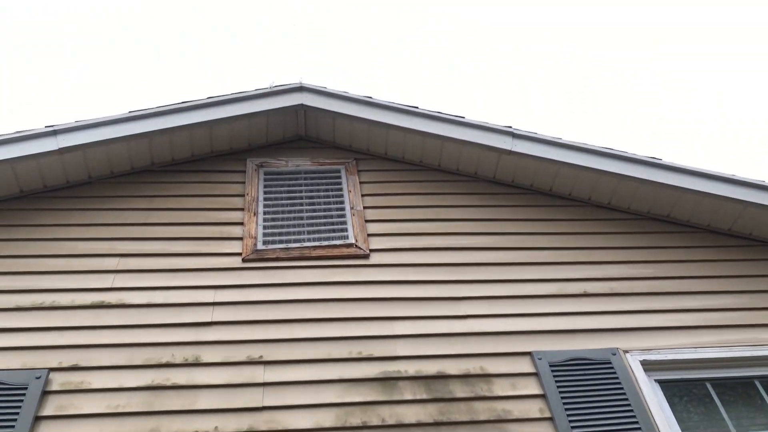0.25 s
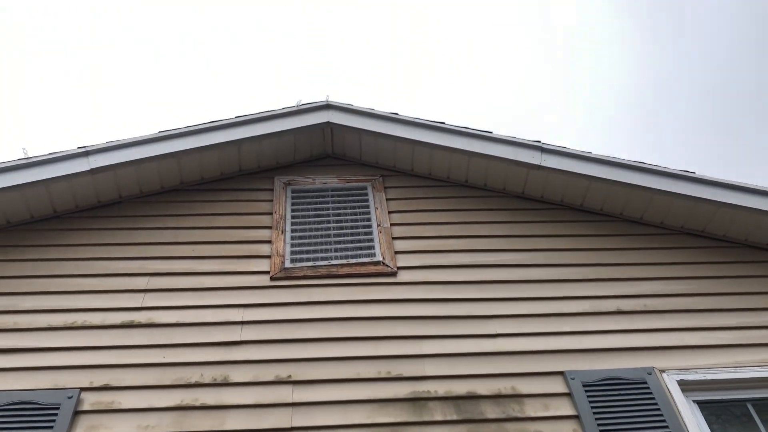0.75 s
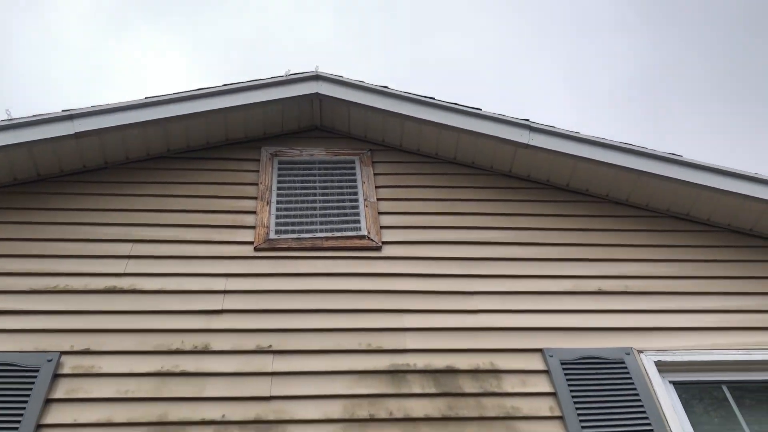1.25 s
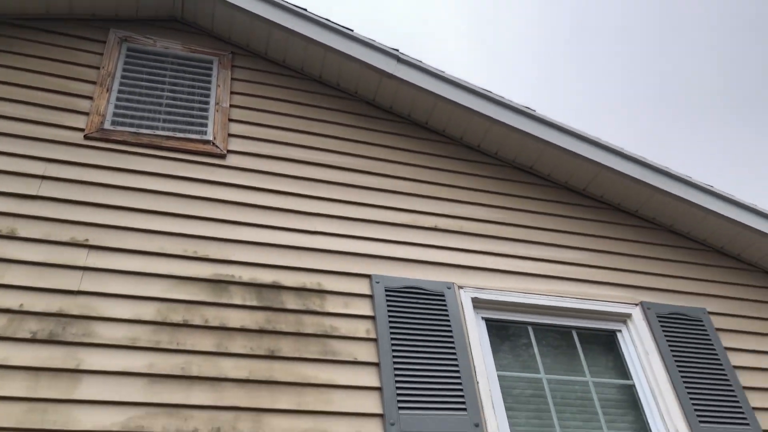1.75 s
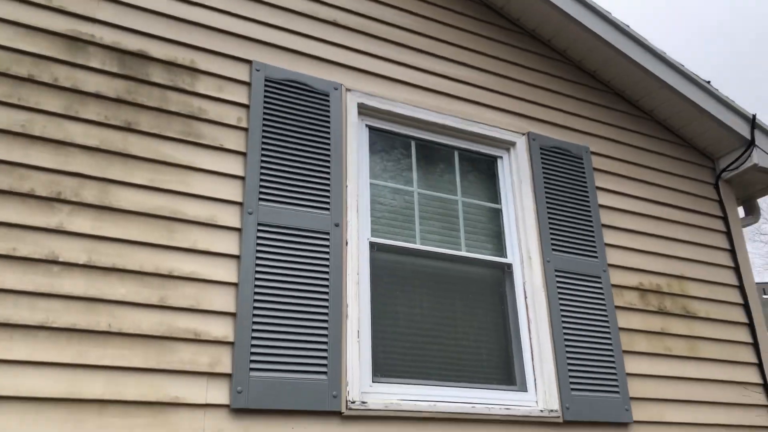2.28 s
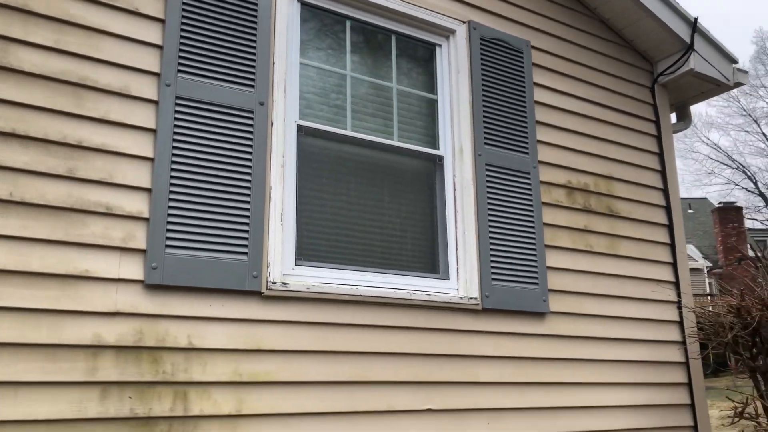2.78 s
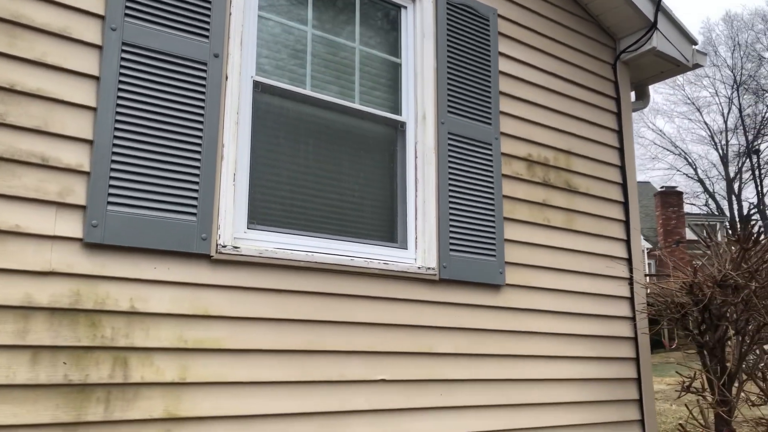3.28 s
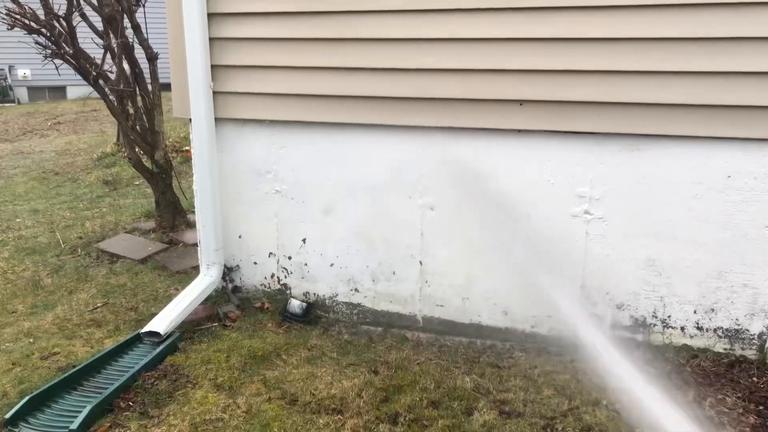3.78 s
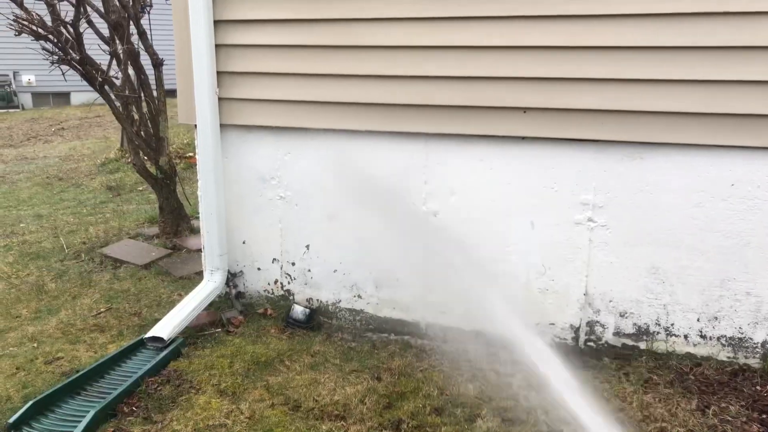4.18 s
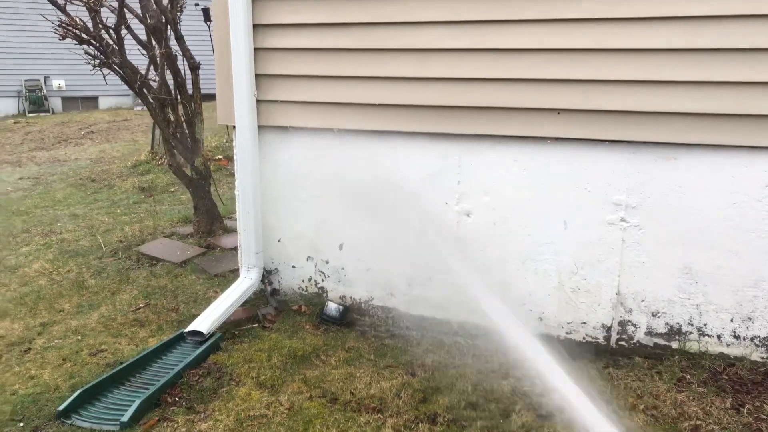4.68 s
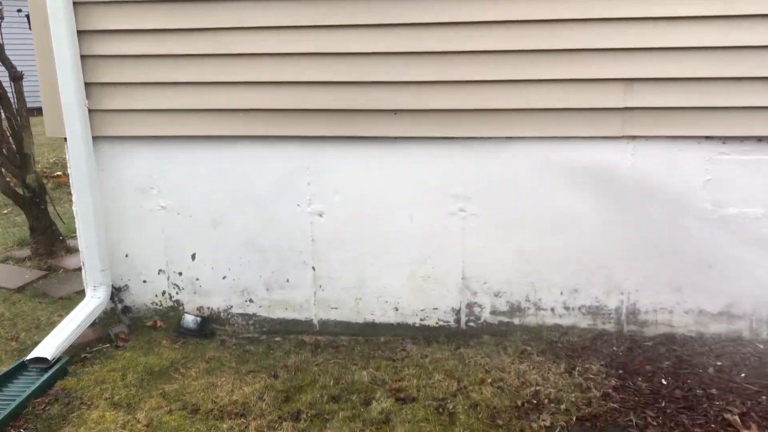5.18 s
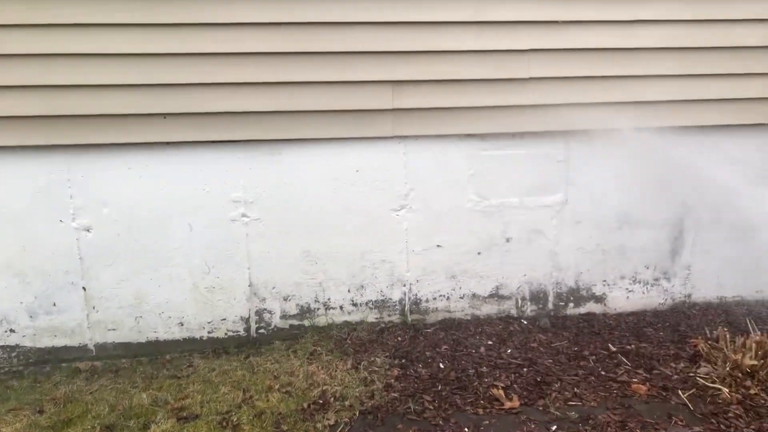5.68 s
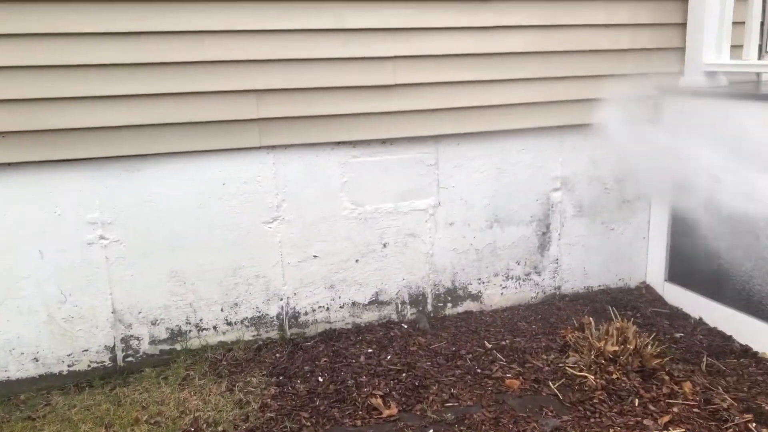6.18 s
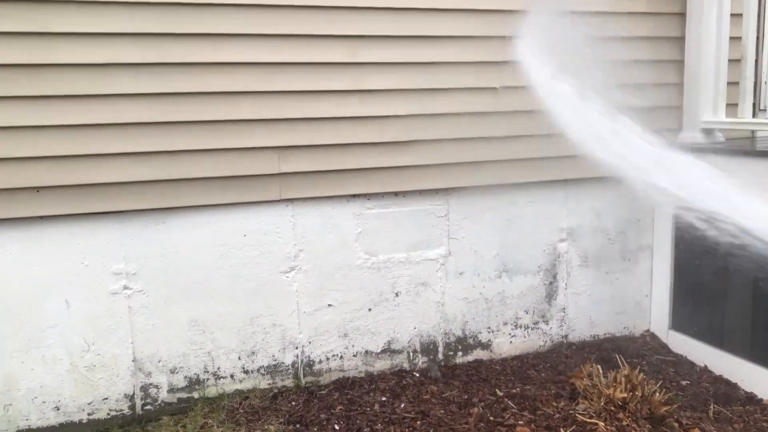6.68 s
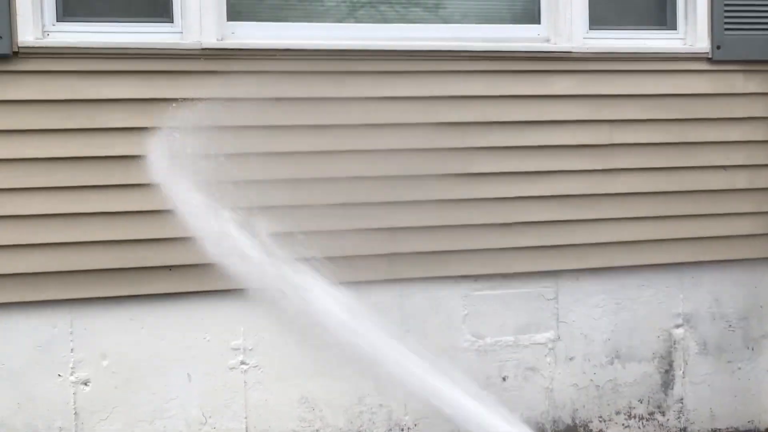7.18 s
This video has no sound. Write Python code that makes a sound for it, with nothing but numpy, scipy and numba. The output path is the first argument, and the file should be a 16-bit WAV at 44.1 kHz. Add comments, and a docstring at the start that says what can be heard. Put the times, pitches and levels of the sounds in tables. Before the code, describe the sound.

Outdoors beside a house, a one-cylinder petrol pressure washer runs some way off, with a steady low thumping and a light rattle that slowly grows. Faint drops splat and plink from the wet siding, becoming a little clearer between 2 and 3 seconds. At about 3.5 seconds the jet opens abruptly, close by: a loud, bright hiss with a high ring from the nozzle and a lower rush of water on the wall. At the same moment the engine drops slightly in pitch and thumps harder, joined by the pump's hum. The spray swells with a brief swish around 4.2 seconds, then eases a little from 5 to 6 seconds. A few more soft swishes come between 6 and 7 seconds. From about 6.3 seconds the rush grows fuller as the water climbs onto hollow siding, and the hiss is strongest at the end, near 7.5 seconds.

```python
"""Beside a house, water drips from the wet siding while a petrol pressure washer runs some way off.
Each drop lands with a splat or a plink, and the one-cylinder engine thumps and rattles. When the trigger
is pulled, the pump loads the engine, which slows and thumps harder. The jet hisses close by, and its
churning flow makes the nozzle ring. The fan of water sweeps along the wall and sizzles over its edges."""
import sys
import numpy as np
from scipy import signal
from scipy.fft import rfft, irfft
from scipy.io import wavfile
from scipy.ndimage import uniform_filter1d, map_coordinates
from numba import njit

SR = 44100
rng = np.random.default_rng(int(sys.argv[2]) if len(sys.argv) > 2 else 0)


def transcribe(u):
    """Save the signal u as a 16-bit wav file named by the first command-line argument.

    u: samples, shape (n,) or (channels, n), limited to [-1, 1]; the rate is SR.
    q: integer samples, one column per channel.
    """
    v = np.clip(np.atleast_2d(u).T, -1, 1)
    q = np.round(v * 32767).astype(np.int16)
    wavfile.write(sys.argv[1], SR, q)


N = 328104
TIME = np.arange(N) / SR

# the wand sweeps nearer and farther: t/s, spray strength/dB, nozzle ring/dB (0 dB is the usual)
WAND_SWEEP = [(3.5, -0.1, -1.1), (4.1, 1.3, 0.1), (4.35, 2.1, 1.5), (4.63, 1.5, 1.5), (5.08, -2.4, -1.6),
              (5.4, -1.4, -1.2), (5.8, -1.7, -2.8), (5.98, -3.5, -3.5), (6.17, -1.7, -3), (6.38, -0.5, 1.5),
              (6.54, -0.9, 0.5), (6.66, -2.5, 0.2), (6.8, 2, 5.5), (6.9, 2.5, 5), (7.02, 0.9, 1.5),
              (7.17, 3.5, 4.5), (7.35, 2, 3), (7.44, 4.5, 5.1)]
# the pitches at which the nozzle rings: multiple of the lowest, width/Hz, relative level/dB
NOZZLE_RINGS = [(1, 375, 0), (2.535, 720, -6.2), (3.92, 1050, -8.5)]
# tone colours of the water's low rush, its hiss and its fine mist: f/Hz, relative level/dB
RUSH_COLOUR = [(25, -18), (60, -6), (110, -2.5), (190, 2), (330, -3.5), (520, 1.5), (900, 0.5), (1600, 0.5),
               (2200, -7), (4000, -3.5), (16000, -34)]
HISS_COLOUR = [(1200, -40), (2050, -1.5), (3100, -4.5), (4100, -6.5), (4900, -1.5), (5500, -3.5), (7000, 0),
               (8400, 0), (10000, -1.5), (12000, -7.5), (16000, -25)]
MIST_COLOUR = [(5000, -41), (8500, -9.5), (11000, -0.5), (12200, 1.5), (13400, 0), (14600, 3.5),
               (16000, -2.5)]
# the jet sings over an edge or hollow of the wall: t/s, length/s, start f/Hz, end f/Hz, width/Hz, level/dB
WALL_EDGES = [(4.19, .14, 3700, 4300, 850, -28), (4.24, .12, 5750, 5450, 750, -22),
              (6.10, .16, 6000, 4600, 600, -33), (6.21, .18, 4350, 4200, 600, -30.5),
              (6.32, .11, 5900, 5700, 800, -29), (6.92, .15, 3700, 4700, 800, -30.5),
              (6.96, .11, 5800, 5950, 800, -29)]
# the exhaust note, running free and under load: multiple of the cycle rate, relative level/dB
FREE_HARMONICS = [(1, -27), (2, 0.5), (3, -3.5), (4, -5.5), (5, -19), (6, -11.5), (7, -29), (8, -14.5),
                  (9, -12.5), (10, -25), (11, -24), (12, -24), (13, -48)]
LOADED_HARMONICS = [(1, -31), (2, 0), (3, -0.5), (4, -8), (5, 0.5), (6, -11), (7, -30), (8, -14.5),
                    (9, -14.5), (10, -21), (11, -19.5), (12, -17), (21, -18), (26, -11), (27, -23)]
# tone colours of the engine's low clatter and bright rattle: f/Hz, relative level/dB
CLATTER_COLOUR = [(25, -18), (55, -15), (90, -7), (200, 0), (340, -5.5), (480, 0.5), (800, -1.5),
                  (1100, -2), (1600, -6), (2300, -12), (4000, -22.5), (16000, -69)]
RATTLE_COLOUR = [(1000, -20), (2200, -4), (3000, 0), (4600, -3), (5600, -8), (7000, -9.5), (9000, -17.5),
                 (12000, -24.5), (16000, -27)]
# the loudest drips: t/s, peak level/dB, f/Hz, width/Hz
LOUD_DRIPS = [(.680, -44, 10000, 10000), (1.323, -47, 11900, 10000), (1.595, -43, 4990, 600),
              (1.648, -43, 7700, 1400), (1.941, -40, 14000, 9000), (2.041, -35, 10000, 13000),
              (2.229, -40, 13500, 9000), (2.374, -40, 4930, 500), (2.551, -39, 12500, 10000),
              (2.618, -41, 5670, 900), (2.916, -36, 4800, 9000), (2.923, -43, 7350, 1500),
              (2.958, -43, 7650, 800), (3.070, -33.5, 8000, 11000), (3.110, -44, 12300, 3500),
              (3.219, -44, 12000, 12000)]

TRIGGER_S, OPEN_S = 3.486, .021  # when the valve opens, and how long that takes
SIDING_S, CLIMB_S = 6.29, .23  # when the jet climbs from concrete footing to siding, and for how long
FREE_HZ, LOADED_HZ, SLOWING_S = 32.2, 30.15, .045  # engine cycles a second, and the time to settle


def jet():
    """Water rushes and hisses on the wall, following the wand; the hollow siding drums louder."""
    strength_db, ring_db = along(WAND_SWEEP)
    on_siding = np.clip((TIME - SIDING_S) / CLIMB_S, 0, 1)
    ringing = nozzle(strength_db, ring_db, on_siding)
    rush = colour(spray(flutter_db=.53, grain_db=.5), RUSH_COLOUR)
    rush *= undb(-30 + .3 * strength_db + 2.4 * on_siding)
    hiss = colour(spray(flutter_db=.5, grain_db=.5), HISS_COLOUR)
    hiss *= undb(-22.5 + .99 * strength_db - .05 * on_siding)
    mist = colour(spray(flutter_db=.35, grain_db=3), MIST_COLOUR)
    mist *= undb(-22 + 1.05 * strength_db)
    return ringing + rush + wall_echo(hiss + mist, share=.17 + .08 * on_siding)


def nozzle(strength_db, ring_db, on_siding, rest_hz=2488):
    """Churning water rings the nozzle; a stronger jet lifts the pitch and favours the upper rings."""
    lowest_hz = (rest_hz + 3.5 * strength_db + 45 * on_siding) * (1 + .0062 * wander(20))
    flow = spray(flutter_db=.83, grain_db=1.5)
    out = 0
    for ratio, width, db in NOZZLE_RINGS:
        boost_db = .43 * strength_db if ratio > 1 else 0
        out += undb(db + boost_db) * ring(flow, ratio * lowest_hz, width)
    return unit(out) * undb(-24.5 + ring_db + .97 * wander(12))


def spray(flutter_db, grain_db):
    """A thick hail of droplets, large and small, flutters as the jet breaks up."""
    return rng.standard_normal(N) * undb(flutter_db * wander(110) + grain_db * np.tanh(wander(2500)))


def wall_echo(sound, share, usual_lag_s=.000502):
    """The wall's echo follows closely; its lag changes as the wand sways, so the hiss swirls."""
    lag_s = usual_lag_s * np.exp(.29 * wander(4))
    echo = map_coordinates(sound, [(TIME - lag_s) * SR], mode="nearest")
    return (sound + share * echo) / np.sqrt(1 + share ** 2)


def edges():
    """A short, gliding ring swells and fades as the fan of water crosses an edge."""
    out = np.zeros(N)
    for start_s, length_s, start_hz, end_hz, width, db in WALL_EDGES:
        start, n = int(start_s * SR), int(length_s * SR)
        swish = ring(rng.standard_normal(SR)[:n], np.geomspace(start_hz, end_hz, n), width)
        out[start:start + n] += unit(swish) * np.hanning(n) * undb(db)
    return out


def engine(load):
    """One cylinder thumps, clatters and faintly whines; under load the pump's drone joins in."""
    cycle_hz = LOADED_HZ + (FREE_HZ - LOADED_HZ) * np.exp(-np.maximum(TIME - TRIGGER_S, 0) / SLOWING_S)
    cycles = np.cumsum(cycle_hz * (1 + .00296 * wander(25) + .001204 * wander(2))) / SR
    free = exhaust(cycles, FREE_HARMONICS, smear=-.85, rough=.03) * undb(-35.5)
    loaded = exhaust(cycles, LOADED_HARMONICS, smear=-1.3, rough=.038) * undb(-28.5)
    pump = tone(hz=175.7, db=-41.5, waver=.00648)
    whine = tone(hz=2330, db=-66, waver=.01) * undb(2 * wander(5.6))
    clatter = colour(knocks(cycles, depth=.032), CLATTER_COLOUR)
    clatter *= undb(-43 + .35 * wander(6.03))  # wavers with the engine's effort
    rattle_db = -58 + .77 * np.minimum(TIME, TRIGGER_S) + .5 * wander(20)  # grows until the trigger
    rattle = colour(knocks(cycles, depth=.083), RATTLE_COLOUR) * undb(rattle_db)
    return (1 - load) * free + load * (loaded + pump) + whine + clatter + rattle


def exhaust(cycles, harmonics, smear, rough):
    """The firings make a low note; the muffler delays its higher parts, and no two firings are alike."""
    note = 0
    for k, db in harmonics:
        wave = np.cos(2 * np.pi * k * cycles + smear * k * (k - 2))
        note -= undb(db) * wave * (1 + rough * np.sqrt(k) * wander(14))
    return unit(note)


def knocks(cycles, depth):
    """Noise swells with each turn of the crank, twice a cycle, and most on the firing stroke."""
    swell = np.cos(4 * np.pi * cycles) + .5 * np.cos(2 * np.pi * cycles)
    return rng.standard_normal(N) * (1 + depth * swell)


def drips(splat_s=.0008, tail_s=.0073, tail_db=-18):
    """Each drop is a short splat, or a plink if it rings at one pitch; the wall scatters a faint tail."""
    out, t = np.zeros(N), np.arange(SR // 20) / SR
    fade = np.exp(-t / splat_s) + undb(tail_db) * np.exp(-t / tail_s)
    for start_s, db, hz, width in LOUD_DRIPS + soft_drips():
        drop = ring(rng.standard_normal(len(t)) * fade, hz, width)
        start = int(start_s * SR)
        out[start:start + len(t)] += drop * undb(db) / np.abs(drop).max()
    return out


def soft_drips(per_s=14, spread_db=3, low_hz=6000, high_hz=13400, width_hz=5500):
    """Softer drops fall at random until the spray would drown them; gives rows like LOUD_DRIPS."""
    when, size, pitch, width = rng.random((200, 4))[:int(per_s * TRIGGER_S)].T
    start_s = when * TRIGGER_S
    db = -52.5 + start_s + spread_db * (2 * size - 1)  # up 1 dB a second as the wall comes nearer
    return list(zip(start_s, db, low_hz + pitch * (high_hz - low_hz), width_hz * (.5 + width)))


def patter(per_s=20, spread_db=9, fade_s=.0025, level_db=-75.5):
    """Countless tiny drops tick on grass and siding, each surface with its own pitch."""
    out = 0
    for hz in np.geomspace(6500, 13500, 5):
        hits = (rng.random(N) < per_s / SR) * undb(spread_db * np.tanh(rng.standard_normal(N)))
        fades = signal.lfilter([1], [1, -np.exp(-1 / (fade_s * SR))], hits + 1e-18)
        out += ring(fades * rng.standard_normal(N), hz, hz / 2) / np.sqrt(hz)
    return unit(out) * undb(level_db)


def tone(hz, db, waver):
    """A pure tone whose pitch wavers a little."""
    return np.sqrt(2) * undb(db) * np.sin(2 * np.pi * np.cumsum(hz * (1 + waver * wander(10))) / SR)


def ring(x, hz, width):
    """Make a sound ring near one pitch; filtering twice shuts out more of the rest."""
    centre = hz * np.ones(len(x))
    return resonate(resonate(x, centre, float(width)), centre, float(width))


@njit
def resonate(x, hz, width):
    """Let through a band around a pitch that may move; the middle of the band keeps its level."""
    y, band, low = np.empty(len(x)), 0., 0.
    for i in range(len(x)):
        tuning = np.tan(np.pi * min(hz[i], .45 * SR) / SR)
        damping = np.pi * width / SR * (1 + tuning * tuning) / tuning
        swing = (band + tuning * (x[i] - low)) / (1 + tuning * (tuning + damping))
        band, low = 2 * swing - band, low + 2 * tuning * swing
        y[i] = damping * swing
    return y


def colour(x, spectrum):
    """Shape a sound's lows and highs by a tone colour table, then bring its level to one."""
    hz, db = np.transpose(spectrum)
    bins_hz = np.maximum(np.arange(N // 2 + 1) * SR / N, 1)
    gain = undb(np.interp(np.log(bins_hz), np.log(hz), db))
    return unit(irfft(rfft(x) * gain, N))


def wander(per_s):
    """A smooth random wobble of typical size one, changing about per_s times a second."""
    hold = max(int(SR / per_s), 2)
    steps = np.repeat(rng.standard_normal(N)[:N // hold + 1], hold)
    return unit(uniform_filter1d(steps, hold)[:N])


def along(table):
    """Join a table's timed points with straight lines, one curve for each column after the time."""
    times, *columns = np.transpose(table)
    return [np.interp(TIME, times, column) for column in columns]


def undb(db):
    """Turn decibels into a number to multiply by."""
    return 10 ** (np.asarray(db) / 20)


def unit(x):
    """Bring the average level (rms) to one."""
    return x / np.sqrt(np.mean(x ** 2))


def scene():
    """The trigger opens the jet and loads the engine at once; left and right are the same."""
    valve = np.clip((TIME - TRIGGER_S) / OPEN_S, 0, 1)
    mono = engine(valve) + drips() + patter() + valve * jet() + edges()
    return np.array([mono, mono])


def record(dry, top_hz=15800):
    """Cut off the very highest treble steeply."""
    return signal.sosfilt(signal.ellip(12, .1, 90, top_hz, fs=SR, output="sos"), dry)


dry = scene()
out = record(dry)
transcribe(out)
```